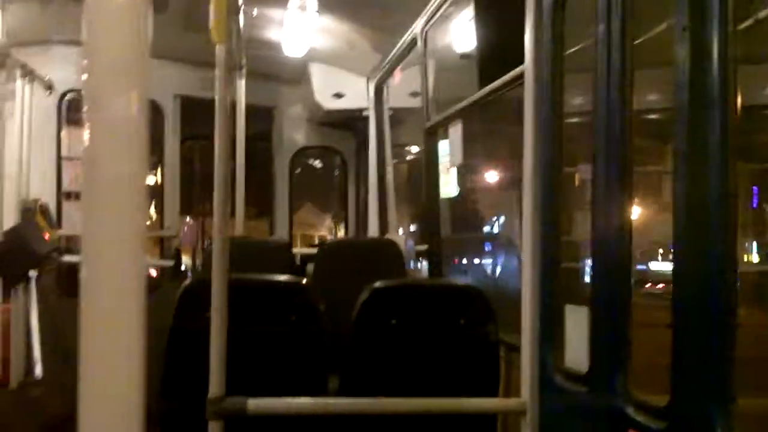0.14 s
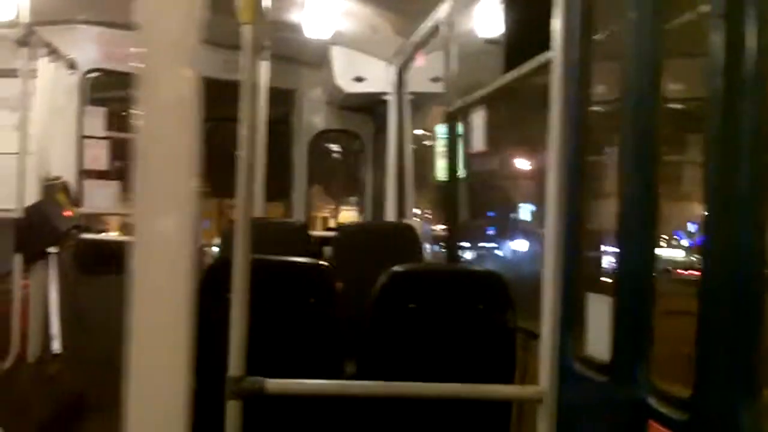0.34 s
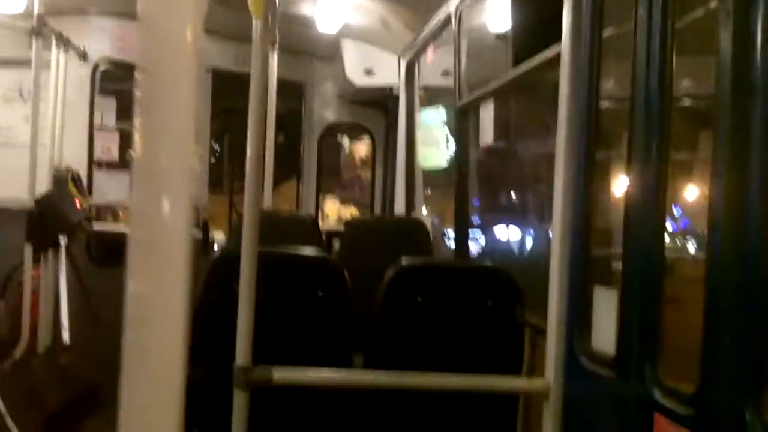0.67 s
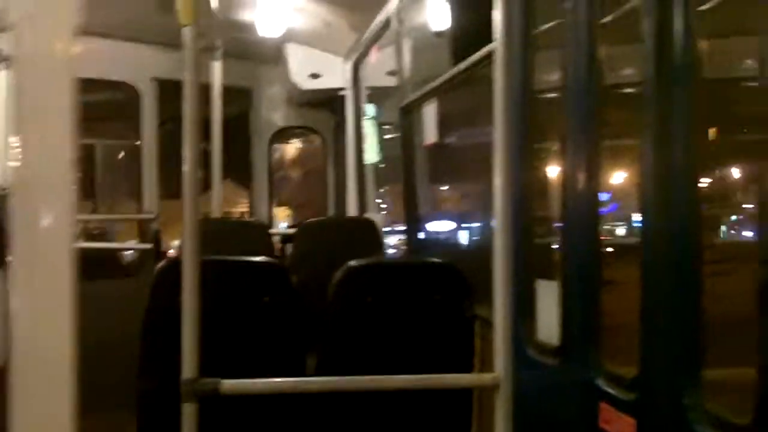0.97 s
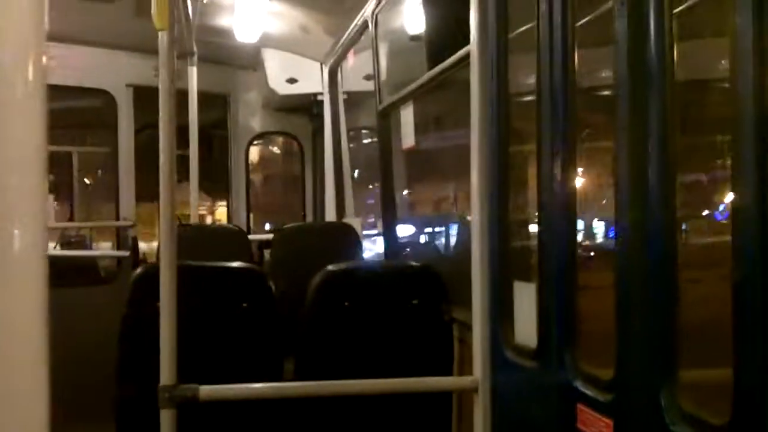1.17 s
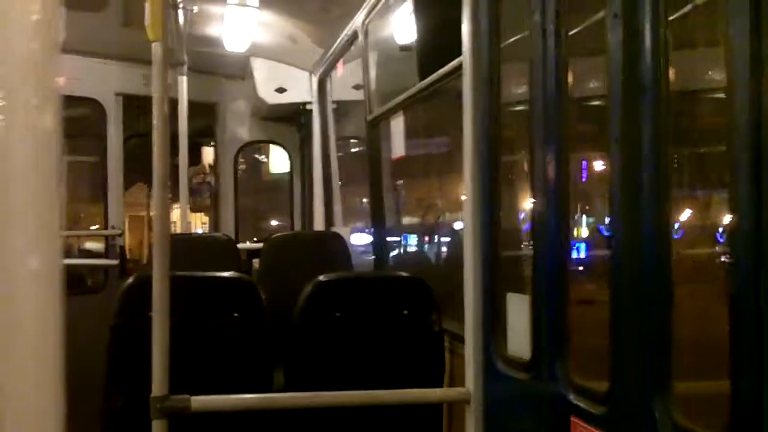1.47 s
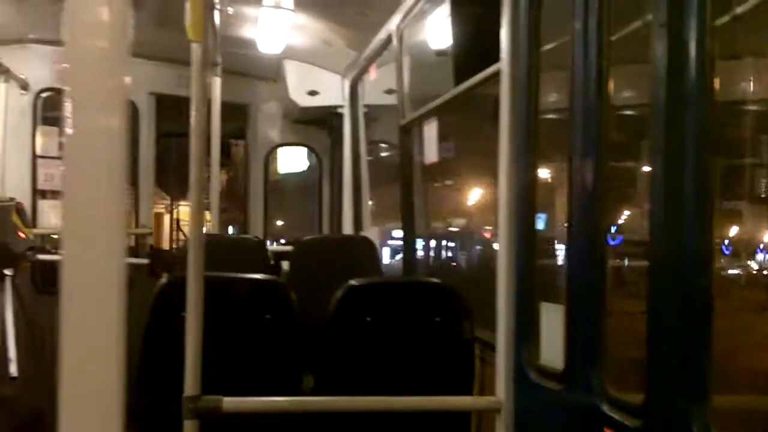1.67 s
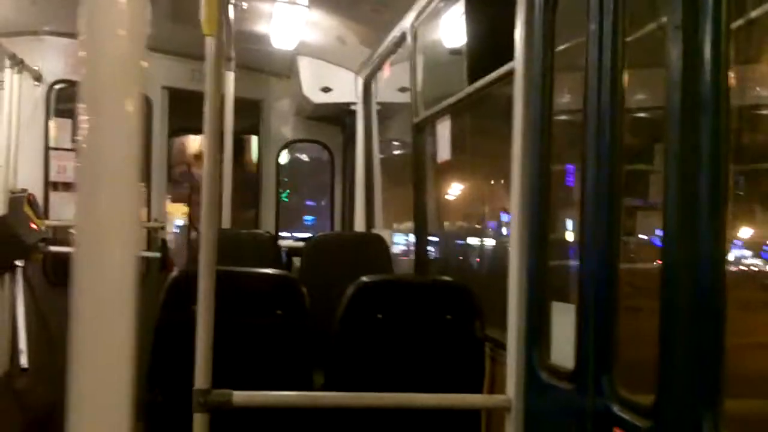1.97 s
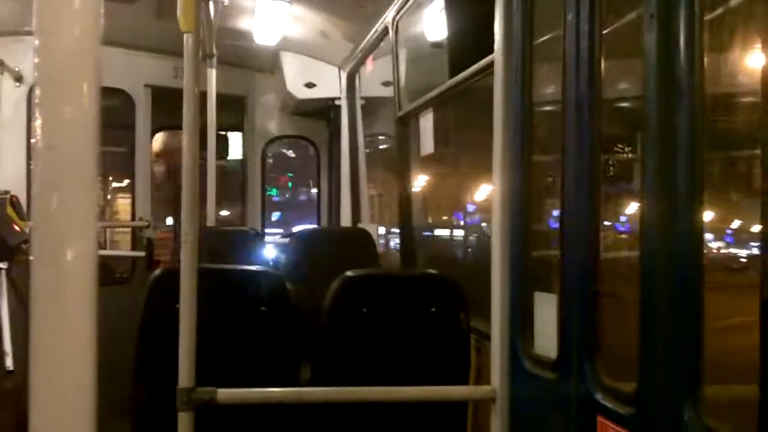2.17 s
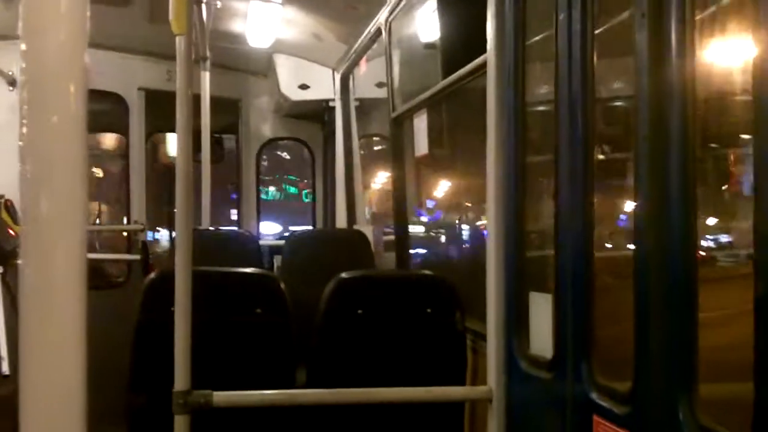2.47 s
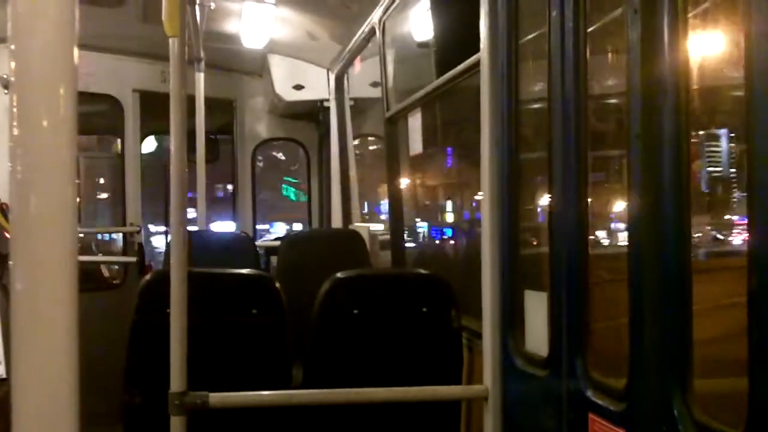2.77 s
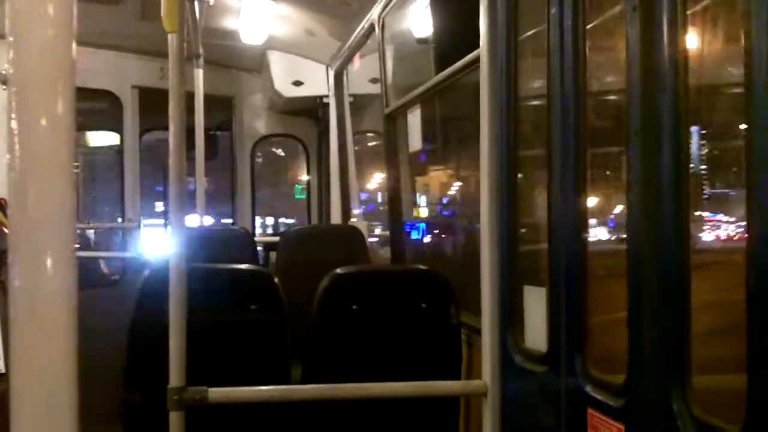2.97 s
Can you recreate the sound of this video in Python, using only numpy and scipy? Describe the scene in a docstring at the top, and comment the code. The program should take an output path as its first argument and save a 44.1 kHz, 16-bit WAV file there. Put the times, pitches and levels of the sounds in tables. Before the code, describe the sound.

Trolleybus interior rumble and low electric hum, with early metallic rattles, thin squeaks and later thumps

```python
"""Inside a trolleybus, heard from a seat in the cabin: from the start the drive hums, its pitch creeping up
as a sine on a speed curve; tyre roar and boom are filtered noise, body sway and bumps add unsteady low tones.
In the first second loose door fittings chatter as ringing clicks, and from 0.3 s they squeak as short tones;
reflections from the hard walls smear both. From 1.4 s a wall panel sings and sharp jolts thump the cabin.
The microphone has a dead spot in the treble and hears little above 15 kHz."""
import sys
import numpy as np
from scipy import signal
from scipy.fft import rfft, irfft
from scipy.io import wavfile

SR = 44100
rng = np.random.default_rng(int(sys.argv[2]) if len(sys.argv) > 2 else 0)


def bounce(signal):
    """Save signal as a 16-bit WAV file at the path given by the first command-line argument."""
    frames = np.transpose(np.atleast_2d(signal))
    limited = np.clip(frames, -1, 1)
    pcm = np.round(limited * 32767).astype(np.int16)
    wavfile.write(sys.argv[1], SR, pcm)


N = 137592
T = np.arange(N) / SR  # s
FREQ = np.arange(N // 2 + 1) * SR / N + 1e-6  # Hz, just above zero so its logarithm exists

# tyre roar through the floor [t/s, level/dB]
ROAR = [(0, -35.5), (.08, -36), (.24, -39.5), (.55, -36), (.88, -36), (1.01, -33), (1.14, -36),
        (1.33, -32.5), (1.45, -31), (1.62, -35), (1.8, -31), (2.235, -31), (2.275, -33.5), (2.5, -30.5),
        (2.66, -30), (2.76, -34), (2.92, -33), (3.12, -32)]
# cabin resonances [f/Hz, width/Hz, relative level/dB, swell per swell of tyre roar/(dB/dB)]
CABIN_MODES = [(76.2, 27.3, 3, 1.26), (112.7, 34, 0.5, 0.27), (166.2, 30, -4.5, 1.3),
               (214.5, 27.6, -5.5, 0.75), (237.8, 13.3, -10, 1), (297.6, 28, -9.5, 1),
               (323.6, 43.6, -9, 1.5)]


def undb(db):
    """Decibels to gain."""
    return 10 ** (np.asarray(db) / 20)


def unit(x):
    """Scale to rms 1."""
    return x / np.sqrt(np.mean(x ** 2))


def curve(rows):
    """Join (s, value) rows by straight lines."""
    return np.interp(T, *np.array(rows).T)


def colour(points):
    """Gain at each frequency from (Hz, dB) points, joined along log frequency."""
    hz, db = np.array(points).T
    return undb(np.interp(np.log(FREQ), np.log(hz), db))


def resonance(hz, width):
    """Response of one resonance, gain 1 at its centre."""
    return 1 / (1 + 1j * (FREQ / hz - hz / FREQ) * hz / width)


def shape(x, response):
    """Filter a sound by a frequency response."""
    return irfft(rfft(x) * response, N)


def noise(response):
    """Filtered noise of rms 1."""
    return unit(shape(rng.standard_normal(N), response))


def walk(rate):
    """Smooth random drift of rms 1, holding little above rate in Hz."""
    return noise(np.exp(-(FREQ / rate) ** 2))


def tone(hz):
    """A sine of rms 1 on a moving pitch, from a random phase."""
    cycles = np.cumsum(hz) / SR + rng.random()
    return np.sqrt(2) * np.sin(2 * np.pi * cycles)


def burst(start, length, attack, release):
    """Straight attack, hold and exponential release; all times in s, length includes the attack."""
    rise = np.clip((T - start) / attack, 0, 1)
    fall = np.exp(-np.maximum(T - start - length, 0) / release)
    return rise * fall


def cabin(x, wet):
    """Dense reflections from windows and panels: decaying noise, with wet as its share of the power."""
    t60 = 0.52  # s
    tail = rng.standard_normal(N) * undb(-60 * T / t60)
    tail = tail * (T > .003)  # first reflections arrive after 3 ms
    reflected = signal.fftconvolve(x, tail)[:N] / np.sqrt(np.sum(tail ** 2))
    return np.sqrt(1 - wet) * x + np.sqrt(wet) * reflected


def drive():
    """The drive line hums with speed and load, gears add overtones, the electrics a whine and thin whistles."""
    # drive speed heard as hum pitch [t/s, f/Hz]
    speed = [(0, 51.99), (.6, 51.85), (1.2, 52.5), (1.7, 54.94), (2.4, 55.82), (3.12, 57.38)]
    # drive load heard as hum level [t/s, level/dB]
    load = [(0, -18), (.13, -19.5), (.25, -21), (.31, -41), (.42, -21.5), (.64, -24), (.76, -17.5),
            (.9, -23.5), (1.03, -19), (1.3, -26.5), (1.43, -30), (1.96, -23.5), (2.4, -34.5), (2.8, -22.5),
            (3.12, -26.5)]
    # overtones [multiple of the hum pitch, level/dB]
    orders = [(2, -41.5), (3, -43.5), (5.8, -51.5)]
    # faint whistles of the motor control [f/Hz, level/dB]
    whistles = [(11930, -82), (12620, -86.5)]
    flutter_db = 1.5  # of the overtones and the whine

    hum_hz = curve(speed) * (1 + .0069 * walk(4.03))
    out = tone(hum_hz) * undb(curve(load))
    for multiple, db in orders:
        out = out + tone(hum_hz * multiple) * undb(db + flutter_db * walk(12))
    for hz, db in whistles:
        out = out + tone(hz * (1 + .004 * walk(200))) * undb(db + 3.2 * walk(8))
    whine_hz = 399.4 * (1 + .00696 * walk(13.7))
    whine = tone(whine_hz) * undb(-48.5 + flutter_db * walk(25))
    return out + whine


def road():
    """Road roughness drives the tyre roar and the cabin resonances; the body sways below them."""
    # tyre roar after the floor [f/Hz, relative level/dB]
    floor_colour = [(60, 0), (300, -0.5), (450, -1.5), (650, -1.5), (820, 1), (1300, -1.5), (2000, -10),
                    (3000, -20), (4500, -26.5), (7000, -29), (8300, -40), (9800, -46)]
    # sway of the body [f/Hz, relative level/dB]
    sway_colour = [(6, -5), (14, 22.5), (24, 22.5), (34, 19.5), (43, 17), (53, 11.5), (70, 12),
                   (170, -73.5)]
    boom_db, boom_flutter_db, sway_db = -36, 1.94, -25.5

    rough_db = curve(ROAR)
    # a further 2.4 dB lost per kHz above 9.5 kHz
    treble_loss = undb(-2.4 * np.maximum(FREQ - 9500, 0) / 1000)
    roar = noise(colour(floor_colour) * treble_loss) * undb(rough_db + 0.87 * walk(43))
    boom = 0
    for hz, width, db, follow in CABIN_MODES:
        swell_db = follow * (rough_db - rough_db.mean()) + boom_flutter_db * walk(6.1)
        # squared: the resonance acts twice in a row
        boom = boom + noise(resonance(hz, width) ** 2) * undb(boom_db + db + swell_db)
    sway = noise(colour(sway_colour)) * undb(sway_db)
    return roar + boom + sway


def shake():
    """The body's low modes swing almost steadily, swelling or easing with the tyre roar."""
    # low modes of the body [f/Hz, level/dB, swell per swell of tyre roar/(dB/dB)]
    modes = [(13.7, -27, -0.9), (34.26, -29, 1.3)]
    swell_db = curve(ROAR) - curve(ROAR).mean()
    out = 0
    for hz, db, follow in modes:
        swing = tone(hz * (1 + .026 * walk(1.88)))
        out = out + swing * undb(db + follow * swell_db + 2 * walk(6))
    return out


def panel():
    """A wall panel sings on one fixed pitch, faint at first and then swelling up."""
    # singing of the panel [t/s, level/dB]
    singing = [(1.4, -53), (1.68, -35.5), (2.15, -40.5), (2.5, -47)]
    return tone(np.full(N, 237)) * undb(curve(singing) + 2 * walk(8.8))


def rattles():
    """Loose fittings chatter: bursts of dense uneven clicks ring their metal."""
    # bursts, the first already under way [t/s, length/s, attack/s, level before the envelope/dB, treble lift/dB]
    chatter = [(-.03, 0.081, .01, -40.5, -6.5), (0.314, 0.076, 0.028, -42.5, 2),
               (0.393, 0.026, .012, -42.5, -5), (0.508, 0.042, 0.014, -33.5, -2.5),
               (0.571, 0.033, 0.023, -37.5, -6), (0.601, 0.052, 0.013, -35, 3),
               (0.658, 0.074, 0.022, -39.5, -0.5), (0.819, 0.062, 0.026, -45.5, 3),
               (0.927, 0.067, 0.025, -50.5, -2), (1.657, 0.06, .01, -55.5, 7)]
    # metal as a whole [f/Hz, relative level/dB]
    metal_colour = [(300, -2.5), (900, -3.5), (2400, -2.5), (4500, -2), (7000, -4), (8600, -12),
                    (10000, -22), (14000, -33), (16000, -45)]
    # rings of the loose fittings [f/Hz, width/Hz, relative level/dB]
    rings = [(2320, 60, 4.5), (2870, 73, 0.5), (3340, 42, -0.5), (3790, 56, -8.5), (4420, 57, -9),
             (6450, 160, -1.5)]
    clicks_per_s, scatter_db, release_s, wet = 800, 3, .012, .51

    ringing = sum(undb(db) * resonance(hz, width) for hz, width, db in rings)
    metal = colour(metal_colour) * (1 + ringing)
    treble = FREQ ** 4 / (FREQ ** 4 + 5500 ** 4)  # half the lift at 5.5 kHz
    out = 0
    for start, length, attack, db, lift_db in chatter:
        hits = rng.random(N) < clicks_per_s / SR
        signs = np.sign(rng.standard_normal(N))
        clicks = hits * signs * undb(scatter_db * rng.standard_normal(N))
        clatter = unit(shape(clicks, metal * undb(lift_db * treble)))
        out = out + clatter * undb(db) * burst(start, length, attack, release_s)
    return cabin(out, wet)


def bumps():
    """Each bump swells one resonance of the body: a brief tone of uneven pitch and level."""
    # bumps in the road [t of the crest/s, length from crest to 1/e/s, f/Hz, level/dB]
    thuds = [(0.076, 0.04, 325, -39), (0.942, 0.087, 112, -35.5), (1.456, 0.078, 87, -24),
             (1.54, 0.029, 215, -29.5), (1.35, 0.14, 218, -36.5), (2.089, 0.025, 215, -30),
             (2.241, 0.032, 31.01, -16.5), (2.572, 0.11, 326, -37), (2.655, 0.1, 111.6, -25.5),
             (2.665, 0.04, 214, -24)]
    out = 0
    for time, length, hz, db in thuds:
        ring = tone(hz * (1 + .061 * walk(hz / 2)))
        swell = np.exp(-((T - time) / length) ** 2)
        out = out + ring * undb(db + 4.1 * walk(hz / 2)) * swell
    return out


def squeaks():
    """Dry metal joints slip and sing briefly on an unsteady pitch."""
    # squeaks [t/s, length/s, f/Hz, level/dB]
    slips = [(0.299, 0.027, 6540, -46.5), (0.319, 0.015, 6460, -40), (0.39, 0.017, 6530, -50),
             (0.507, 0.046, 2400, -42), (0.615, 0.039, 6350, -46.5), (0.621, 0.033, 7090, -43.5),
             (0.696, 0.015, 7160, -41.5), (0.711, 0.047, 10270, -63.5), (0.705, 0.06, 11800, -72),
             (0.827, 0.096, 7080, -56), (.835, 0.055, 10100, -72)]
    attack_s, release_s, wet = .0029, .0037, .32
    out = 0
    for start, length, hz, db in slips:
        song = tone(hz * (1 + .005 * walk(270))) * undb(db + 2.7 * walk(90))
        out = out + song * burst(start, length, attack_s, release_s)
    return cabin(out, wet)


def jolts():
    """A wheel drops over an edge: one short push thumps all cabin resonances at once."""
    # hard jolts [t/s, contact time from crest to 1/e/s, peak level/dB]
    edges = [(1.407, .0014, -19), (2.228, 0.0019, -16), (2.612, 0.00067, -17.5), (2.65, 0.00063, -14),
             (2.666, 0.0014, -15)]
    body = sum(undb(db) * resonance(hz, width) for hz, width, db, follow in CABIN_MODES)
    out = 0
    for time, contact, db in edges:
        push = np.exp(-((T - time) / contact) ** 2)
        thump = shape(push, body)
        out = out + undb(db) * thump / np.abs(thump).max()
    return out


def scene():
    """Everything heard from a seat in the cabin, as one channel."""
    steady = drive() + road() + shake() + panel()
    events = rattles() + bumps() + squeaks() + jolts()
    return (steady + events)[None]


def record(dry):
    """The microphone's treble dead spot, then a steep top cut."""
    notch_hz, notch_width_hz, top_hz = 5425, 1760, 15200
    notch = signal.iirnotch(notch_hz, notch_hz / notch_width_hz, fs=SR)
    heard = signal.lfilter(*notch, dry)
    # order 10, 0.2 dB ripple below the cut, 70 dB down above it
    top_cut = signal.ellip(10, .2, 70, top_hz, fs=SR, output="sos")
    return signal.sosfilt(top_cut, heard)


dry = scene()
out = record(dry)
bounce(out)
```